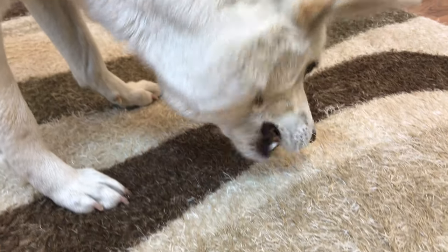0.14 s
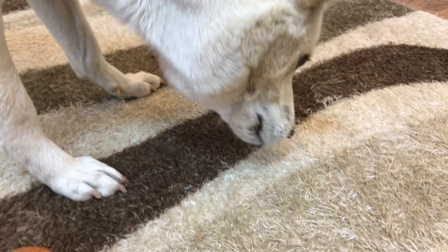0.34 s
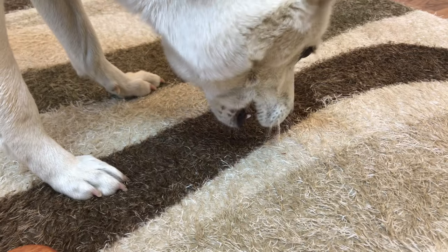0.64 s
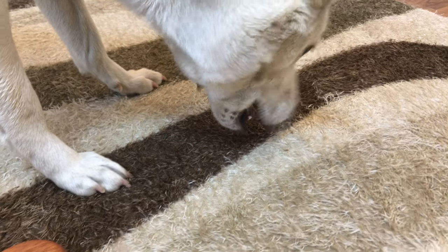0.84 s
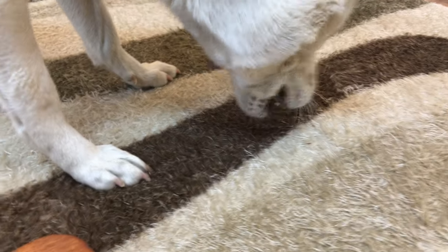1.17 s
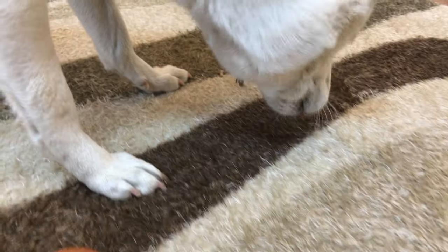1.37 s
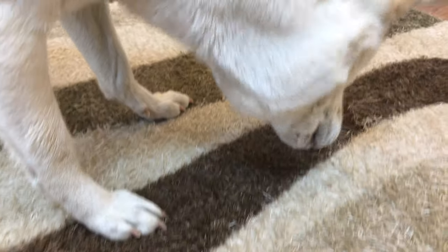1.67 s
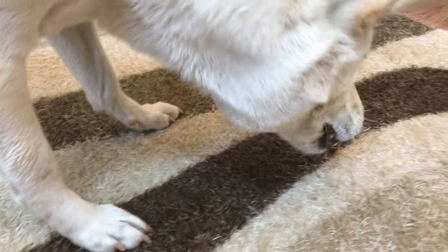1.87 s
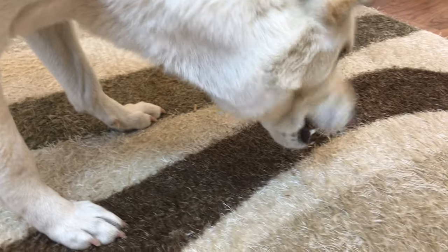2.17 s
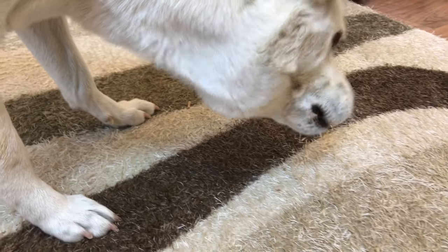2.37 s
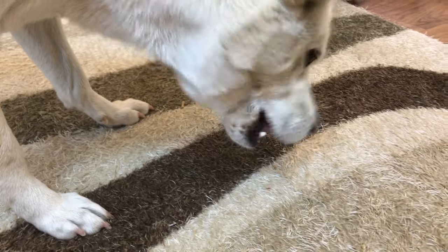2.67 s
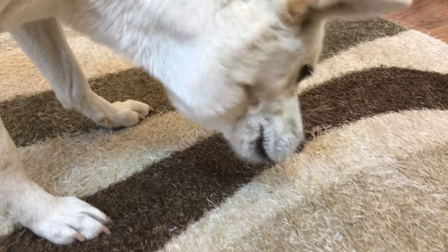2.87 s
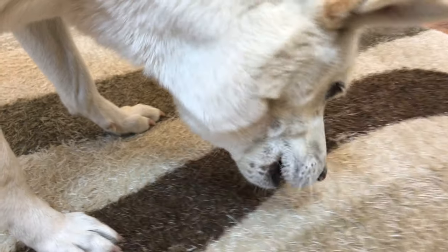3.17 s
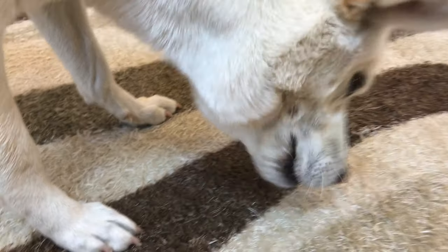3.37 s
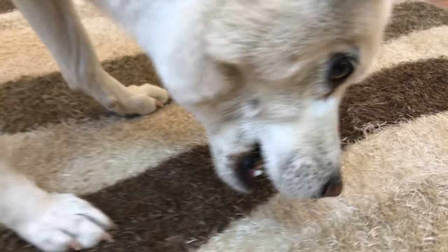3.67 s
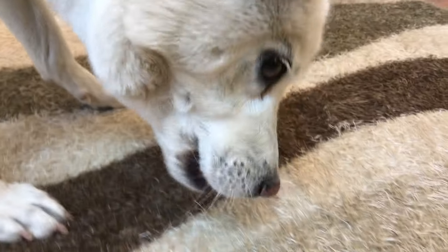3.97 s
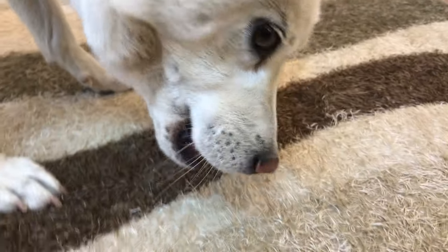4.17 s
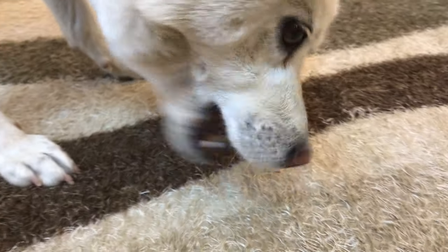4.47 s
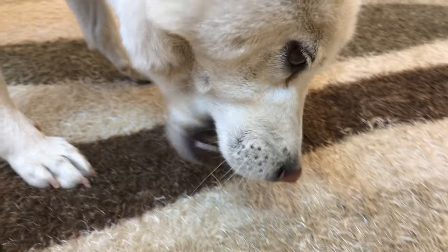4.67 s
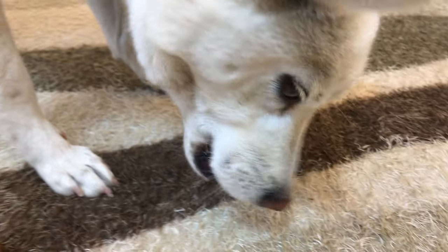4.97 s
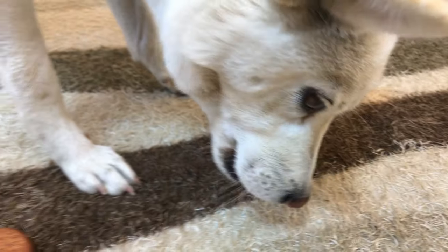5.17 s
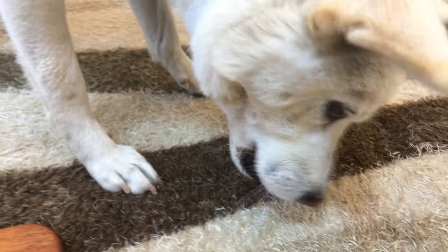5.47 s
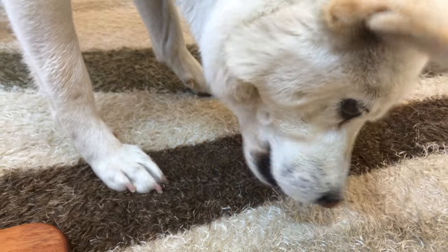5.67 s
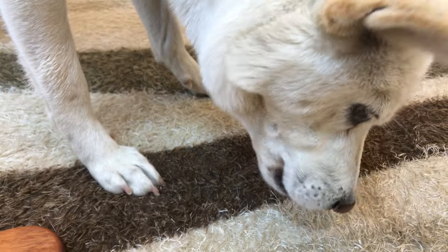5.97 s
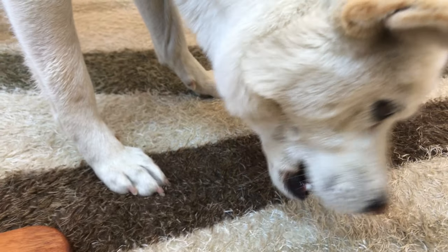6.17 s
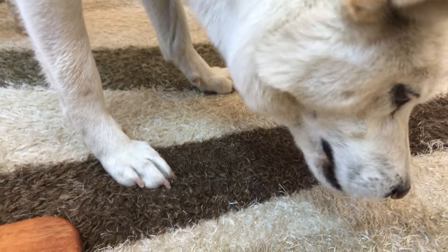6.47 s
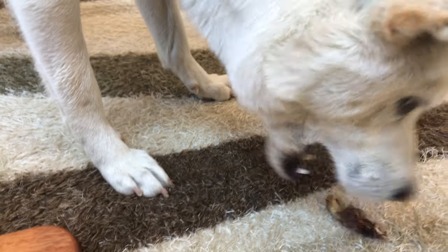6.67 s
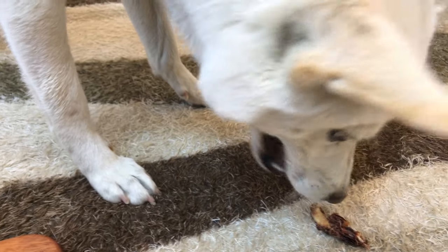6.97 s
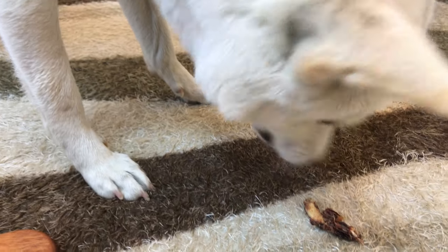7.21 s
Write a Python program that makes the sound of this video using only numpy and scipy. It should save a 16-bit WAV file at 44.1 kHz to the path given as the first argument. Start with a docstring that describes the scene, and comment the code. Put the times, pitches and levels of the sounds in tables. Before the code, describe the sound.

A dog chews a dried bone close to the microphones on a shaggy living-room rug. From 0 to 0.9 s there is soft grinding, saliva crackle, small tooth knocks and lip clicks. Hard, dry cracks with bright splinters strike at about 1.0 and 1.1 s, then a pair near 1.36 and 1.4 s, the latter the loudest. Quieter wet gnawing, smacks and muzzle rubbing follow until a sharp crack at 2.84 s and a tight run of crunches from 3.05 to 3.3 s. Smaller cracks come around 3.8 to 3.95 s. A gurgling swallow at 4.2 s leads into a thin, falling tooth scrape until 4.7 s. After subdued chewing, solitary hard cracks land at 5.3, 6.0 to 6.1 and 6.43 s, some with low bumps. Dull thumps fall at 6.56 and 6.7 s, then light wet mouthing ends. Short room reverberation and faint steady hush throughout.

```python
"""In a living room, close to the microphones, a dog chews a dried bone on a shaggy rug.
Bursts of tiny fractures, and some ringing knocks, excite the damped modes of jaw, mouth cavity and bone
and throw off a bright spray of splinters; teeth knock, lips smack, and low bumps and dull thumps sound.
With each stroke of the jaw teeth grind, crumbs break, saliva crackles and the muzzle rubs the pile.
The dog swallows once and a tooth scrapes the bone; floor and walls answer over a faint steady hush."""
import sys
import numpy as np
from scipy import signal
from scipy.fft import rfft, irfft, next_fast_len
from scipy.io import wavfile
from scipy.ndimage import map_coordinates

SR = 44100
rng = np.random.default_rng(int(sys.argv[2]) if len(sys.argv) > 2 else 0)


def transcribe(u):
    """Save the signal u as a 16-bit wav file named by the first command-line argument.

    u: samples, shape (n,) or (channels, n), limited to [-1, 1]; the rate is SR.
    q: integer samples, one column per channel.
    """
    v = np.clip(np.atleast_2d(u).T, -1, 1)
    q = np.round(v * 32767).astype(np.int16)
    wavfile.write(sys.argv[1], SR, q)


N = 323694  # length [samples]


def amp(db):
    """The decibel law: level to amplitude ratio."""
    return 10 ** (np.asarray(db) / 20)


def unit(x):
    """Normalisation to an rms of 1."""
    return x / np.sqrt(np.mean(x ** 2) + 1e-20)


def per_ms(parts):
    """Energy normalisation: each row gets the energy of 1 ms at rms 1."""
    energy = np.sum(parts ** 2, axis=-1, keepdims=True)
    return parts / np.sqrt(energy / (SR / 1000))


def along(points, hz):
    """Interpolation of (frequency [Hz], value) points on a logarithmic frequency axis."""
    f, v = np.transpose(points)
    return np.interp(np.log(hz + 1), np.log(f + 1), v)


def wobble(rate):
    """Band-limited randomness: a smooth curve through random knots, rate of them a second."""
    knots = rng.standard_normal(int(N * rate / SR) + 4)
    return map_coordinates(knots, [np.arange(N) * rate / SR])


def filtered(x, response):
    """Linear filtering: the spectrum of x times a response of frequency."""
    n = x.shape[-1]
    padded = next_fast_len(n + SR // 4)
    return irfft(rfft(x, padded) * response(np.fft.rfftfreq(padded, 1 / SR)), padded)[..., :n]


def causal(points, size=2048):
    """Minimum-phase response with the gain of (frequency [Hz], gain [dB]) points, by cepstral folding."""
    cepstrum = irfft(np.log(amp(along(points, np.fft.rfftfreq(size, 1 / SR)))))
    cepstrum[1:size // 2] *= 2
    cepstrum[size // 2 + 1:] = 0
    return np.exp(rfft(cepstrum))


def resonance(f, hz, width):
    """Damped harmonic oscillator: one mode of unit peak gain, hz and width in Hz."""
    return 1j * f * width / (hz * hz - f * f + 1j * f * width)


# likeness of left and right in a diffuse field: (frequency [Hz], correlation [0-1])
LIKENESS = [(30, 0.3), (130, 0.12), (300, 0.59), (1400, 0.99), (3100, 0.52), (6800, 0.17), (15000, .1)]


def diffuse(pair, spectrum):
    """Diffuse-field coherence: two unrelated signals are coloured and blended to the stated likeness."""
    turn = lambda hz: np.arccos(np.clip(along(LIKENESS, hz), -1, 1)) / 2
    blend = lambda hz: amp(along(spectrum, hz)) * np.array([np.cos(turn(hz)), np.sin(turn(hz))])
    mid, side = filtered(pair, blend)
    return np.array([mid + side, mid - side])


# colour of the hush of the house: (frequency [Hz], relative density [dB per Hz])
HUSH_COLOUR = [(15, -44), (25, 2), (114, 7.5), (175, 3), (695, -3.5), (1130, -11), (1560, -7), (2280, -8.5),
               (3160, -12), (6210, -16.5), (9070, -18.5), (14800, -20.5), (16000, -28.5)]


def room_tone(level_db=-66):
    """Stationary diffuse noise: the faint steady hush of the house."""
    return amp(level_db) * unit(diffuse(rng.standard_normal((2, N)), HUSH_COLOUR))


def stroke(s, length, attack_s=0.0067, release_s=0.012):
    """Trapezoidal envelope: the pressure of one stroke builds, holds and lets go."""
    corners = [s - attack_s, s, s + length, s + length + release_s]
    return np.interp(np.arange(N) / SR, corners, [0, 1, 1, 0])


def crackle(rate, spread_db, spectrum):
    """Random impulse train: clicks of very unequal size excite one response; rms 1."""
    sizes = amp(spread_db * np.minimum(rng.exponential(size=N), 3)) * rng.choice([-1, 1], N)
    clicks = (rng.random(N) < rate / SR) * sizes
    return unit(signal.fftconvolve(clicks, irfft(causal(spectrum)))[:N])


def pops(rate, low_hz, high_hz, cycles, spread_db, spectrum, size=400):
    """Superposed damped oscillations: random pops ring a few cycles, each at its own pitch; rms 1."""
    when, pitch, life, strength = rng.random((int(rate * N / SR), 4)).T[..., None]
    hz = low_hz * (high_hz / low_hz) ** pitch
    turns = hz * np.arange(size) / SR
    sizes = hz * amp(spread_db * np.minimum(-np.log(1 - strength), 3))
    rings = sizes * np.sin(2 * np.pi * turns) * np.exp(-turns / (cycles * (.5 + life)))
    places = (when * N).astype(int) + np.arange(size)
    track = np.bincount(places.ravel(), rings.ravel(), N + size)[:N]
    return unit(filtered(track, lambda f: amp(along(spectrum, f))))


# strokes of jaw and tongue, levels before the gain of each part:
# (start [s], length [s], grinding level [dB], saliva level [dB])
STROKES = [(0.0, .13, -60.5, -70), (0.293, 0.079, -59, -67), (0.473, 0.094, -65.5, -63.5),
           (0.597, 0.068, -56.5, -76), (0.772, 0.27, -70, -66), (0.993, 0.1, -60.5, -68),
           (1.316, .1, -57.5, -53.5), (1.603, 0.15, -60, -63), (1.936, 0.12, -59.5, -61),
           (2.113, 0.12, -65.5, -61.5), (2.384, 0.11, -58, -63.5), (2.608, 0.24, -59, -62.5),
           (2.872, 0.13, -65, -63), (3.036, 0.16, -52.5, -59), (3.407, 0.095, -71, -62),
           (3.77, .13, -62.5, -62.5), (4.005, 0.22, -61.5, -58.5), (4.383, 0.18, -61, -61.5),
           (4.715, 0.1, -58.5, -58.5), (4.943, 0.44, -68.5, -70.5), (5.523, 0.14, -66, -63),
           (5.785, 0.054, -69.5, -59), (5.879, .055, -54, -61), (6.213, 0.05, -76, -57.5),
           (6.496, 0.17, -67.5, -59), (6.78, 0.043, -65.5, -62), (6.93, 0.063, -69.5, -60),
           (7.05, 0.098, -73, -61), (7.304, 0.051, -57.5, -62)]
# colours of tooth on bone, bursting saliva, muzzle on rug, fur and pile: (frequency [Hz], relative gain [dB])
GRIND = [(300, -23), (750, -3), (930, 3), (1080, 4), (1220, 1.5), (1400, 1), (1700, -4), (2300, -3),
         (4000, -28.5)]
SALIVA = [(1200, -20), (2400, 2.5), (4000, 0), (6300, 2), (8500, -18), (12000, -5.5), (16000, -1.5)]
RUB = [(40, -23), (120, -2), (260, 1), (600, -0.5), (1000, -8.5), (3000, -44.5)]
RUSTLE = [(1500, -25.5), (2800, -4.5), (4200, 0), (6300, -6), (7600, -1.5), (9500, -13.5), (16000, -15.5)]


def gnawing(rub_gain_db=-10, grind_gain_db=-4, saliva_gain_db=-3.0, rustle_gain_db=-7, hollow_gain_db=-10,
            spurt_db=5.0):
    """Random impulse excitation: teeth grind, saliva pops, muzzle and fur rub the rug, stroke by stroke."""
    pressure, wetness = amp(-73), amp(-69.5)  # the mouth is never quite still
    for s, length, grind_db, saliva_db in STROKES:
        shape = stroke(s, length)
        pressure = np.maximum(pressure, amp(grind_db) * shape)
        wetness = np.maximum(wetness, amp(saliva_db) * shape)
    spurts = spurt_db * wobble(45)  # [dB]
    rub = pressure * amp(rub_gain_db + .5 * spurts) * crackle(900, 6, RUB)
    grind = pressure * amp(grind_gain_db + spurts) * pops(460, 600, 3200, 2.6, 5.0, GRIND)
    saliva = wetness * amp(saliva_gain_db + spurts) * pops(1800, 2000, 15500, 2.4, 8, SALIVA)
    rustle = wetness * amp(rustle_gain_db + spurts) * crackle(5000, 5.4, RUSTLE)
    # the half-closed mouth rings while the teeth grind: 1107 Hz, 80 Hz wide
    cavity = filtered(crackle(1200, 2.7, GRIND), lambda f: resonance(f, 1107, 80))
    hollow = pressure * amp(hollow_gain_db) * unit(cavity)
    return rub + grind + hollow + saliva + rustle


# crumbs(), knocks(), smacks() and cracks() each return their contacts as rows of
# (time [s], crumble time [s], jaw [dB], mouth [dB], mouth pitch [Hz], bone [dB], bone pitch [Hz],
# splinters [dB])
MOUTH_HZ, BONE_HZ = 1120, 2380  # usual pitch of the cavity and of the bone
THUD_DB = -10.5  # thud in the jaw, against the ring in the mouth (crumbs: in the bone)


def crumbs(count=2, crumble_s=.0015, over_grind_db=8.5, spread_db=3):
    """Brittle fracture: bits break at random moments of each stroke, louder under harder grinding."""
    rows = []
    for s, length, grind_db, _ in STROKES:
        for when, draws in zip(rng.random(count), rng.standard_normal((count, 4))):
            size, hollow, bright, pitch = draws
            db = grind_db + over_grind_db + spread_db * size
            at = np.clip(s + when * length, 0, N / SR)
            rows.append((at, crumble_s, db + THUD_DB, db + 2 * hollow, MOUTH_HZ * np.exp(.12 * hollow),
                         db, BONE_HZ * np.exp(.2 * pitch), db + 3 * bright))
    return rows


# teeth knock on the bone, and two dull thumps (6.5647 s, 6.7048 s) with hardly any mouth ring:
# (time [s], mouth ring [dB], mouth pitch [Hz], jaw thud [dB])
KNOCKS = [(0.0495, -44.5, 920, -56), (0.241, -34, 1290, -49.5), (0.274, -41, 1240, -58),
          (0.433, -44, 1410, -47), (1.9141, -41.5, 1010, -57), (2.0399, -43, 860, -49.5),
          (2.1347, -40, 840, -46), (2.6143, -48, 1070, -48.5), (3.8842, -29, 1330, -52),
          (4.0098, -42, 1360, -42.5), (4.747, -29.5, 1330, -61.5), (4.8082, -41.5, 1240, -40.5),
          (5.5404, -44, 1424, -60), (5.5587, -40, 1420, -69), (5.6435, -40, 1120, -49.5),
          (5.6544, -42, 1240, -47), (5.6826, -31, 1250, -42.5), (6.0084, -22, 1020, -32.5),
          (6.5647, -63, 1130, -36.5), (6.7048, -60.5, 840, -43.5), (6.862, -42, 970, -52),
          (6.878, -45.5, 990, -50.5), (7.1445, -49, 1060, -53.5), (7.252, -50, 730, -64)]


def knocks(contact_s=0.002, bone_db=-17, splinter_db=-24.5):
    """Impact excitation: knocks and dull thumps, bone and bright spray at fixed levels under the mouth ring."""
    return [(s, contact_s, jaw_db, db, hz, db + bone_db, BONE_HZ, db + splinter_db)
            for s, db, hz, jaw_db in KNOCKS]


# lips and tongue part with a bright wet click: (time [s], parting time [s], level [dB])
SMACKS = [(0.0895, 0.014, -41), (0.096, 0.00026, -44), (0.393, 0.0016, -51), (0.4733, 0.0013, -40),
          (1.5087, 0.00052, -39), (1.8335, 0.0012, -42.5), (1.936, 0.00031, -49), (2.1283, .004, -47),
          (2.2886, 0.0013, -45.5), (3.423, 0.00069, -40), (3.5665, 0.0038, -42), (4.716, 0.0031, -43.5),
          (5.8366, 0.0012, -42), (5.9174, 0.0026, -46), (6.1467, 0.00089, -44), (6.1528, 0.0014, -45),
          (6.2376, 0.0033, -38), (6.355, 0.00078, -45), (6.526, 0.0031, -45), (6.556, 0.0013, -44),
          (6.668, 0.00093, -47), (7.0608, 0.0009, -47.5)]


def smacks(body_db=-10, thud_db=-21.5):
    """Sudden release: a bright click, with mid ring and thud at fixed levels under it."""
    return [(s, parting_s, db + thud_db, db + body_db, MOUTH_HZ, db + body_db, BONE_HZ, db)
            for s, parting_s, db in SMACKS]


# the bone cracks, or a tooth knocks on it with some bone ring (5.1977 s, 5.2206 s):
# (time [s], crumble time [s], bone level [dB], mouth ring over that [dB],
# splinters over that [dB], mouth pitch [Hz], bone pitch [Hz])
CRACKS = [(0.362, 0.0019, -49, -21, -12, 1400, 2340), (0.3798, 0.0023, -47, -16, -1, 1230, 2300),
          (0.4806, 0.0031, -38, -19, -1.5, 980, 3900), (0.604, 0.002, -40, 0, -3, 1240, 3470),
          (0.6097, 0.00058, -43, 3.5, 8.5, 1250, 3570), (0.989, .0033, -18, -10.5, -3, 1320, 2450),
          (1.0754, 0.00078, -37, -20, -5, 1710, 2360), (1.0956, 0.00032, -19.5, -1, -2.5, 1550, 2870),
          (1.101, 0.0012, -18.5, 1.5, -2.5, 1590, 2500), (1.3202, 0.00082, -41.5, 1, 6.5, 1040, 2430),
          (1.3601, 0.0019, -21, -11.5, -6.5, 1160, 2430), (1.3837, 0.00052, -31, -0.5, -21, 1230, 2250),
          (1.4064, 0.001, -11.5, -3, -12, 1300, 2640), (1.6418, 0.0016, -42.5, -2, 1.5, 1040, 2900),
          (1.691, 0.0029, -34, -0.5, 1, 1624, 2970), (2.4, 0.00018, -35, -2, 0, 1305, 1870),
          (2.4444, 0.0033, -41.5, 2, 2, 1080, 2060), (2.469, 0.00054, -43, 0, 5, 920, 2730),
          (2.6828, .0018, -41, 0.5, -6, 1060, 2400), (2.761, .0029, -41.5, -3, 1, 950, 3740),
          (2.78, 0.002, -43, -4, -1.5, 1010, 2500), (3.0422, 0.0024, -44.5, -12, -6, 1170, 2970),
          (2.842, 0.0019, -18, -7, -7.5, 1170, 2750), (3.0747, 0.0048, -31, -1.5, -10.5, 1110, 2800),
          (3.0987, 0.0033, -27.5, -1.5, -1.5, 1120, 2900), (3.1267, 0.00053, -30.5, -3, 6.5, 1140, 3800),
          (3.1503, 0.0052, -24, -7, -9, 1130, 3700), (3.221, 0.0017, -15, -7, -11.5, 890, 2210),
          (3.2492, 0.00028, -16.5, 6, -6.5, 1240, 2090), (3.282, 0.001, -30.5, 2.5, -6.5, 1360, 2170),
          (3.286, 0.00047, -26, 1.5, -14, 1040, 2410), (3.4814, 0.00067, -43, -10, -22, 930, 2520),
          (3.5043, 0.0022, -37.5, -4, -31, 1142, 2800), (3.5247, 0.00091, -39.5, 2, -18, 1140, 2560),
          (3.8171, 0.00045, -37.5, -3, -15, 1337, 2630), (3.8477, .002, -30.5, 2, -13, 1170, 2080),
          (3.9228, 0.00023, -28, 1, -5.5, 1340, 2270), (3.9323, 0.0015, -22.5, -2, 1.5, 1310, 2430),
          (4.1784, 0.013, -39.5, 2, -18, 1170, 3970), (4.189, 0.00027, -33, 5.5, -16, 1420, 2170),
          (4.2561, 0.0031, -40.5, 0, 5, 714, 3830), (5.1977, .0015, -47.5, 8, -3.5, 1030, 2300),
          (5.2206, 0.0012, -46, 7, -5, 1280, 2160), (5.3238, 0.0013, -18.5, 3.5, 4.5, 1296, 2260),
          (6.081, 0.0015, -17.5, 9.5, -8, 1330, 2290), (6.4208, 0.0017, -36.5, 3, -26, 1260, 2390),
          (6.427, 0.00047, -22.5, -7.5, -2.5, 1190, 2260), (6.433, 0.0028, -27, 7, -7, 1100, 1880),
          (6.9446, 0.0018, -44.5, -12, -4, 1520, 2380), (7.0914, 0.00065, -42, -11.5, -26, 1040, 2770),
          (7.1019, 0.00045, -44.5, -23, -24.5, 1690, 2770)]


def cracks(lead_s=0.0033, lead_crumble_s=0.004, lead_db=-26, lead_from_db=-30.5):
    """Fracture and impact: cracks and ringing knocks; above lead_from_db a faint splitting precedes."""
    rows = []
    for s, crumble_s, db, ring_db, splinter_db, mouth_hz, bone_hz in CRACKS:
        stages = [(s, crumble_s, db)]
        if db > lead_from_db:
            stages.append((s - lead_s, lead_crumble_s, db + lead_db))
        for at, time, level in stages:
            mouth_db = level + ring_db
            rows.append((at, time, mouth_db + THUD_DB, mouth_db, mouth_hz, level, bone_hz,
                         level + splinter_db))
    return rows


# what each struck part passes: (frequency [Hz], relative gain [dB])
JAW = [(25, -37.5), (70, -8.5), (140, -9.5), (280, 1), (430, 0.5), (620, 1.5), (1000, -16), (3000, -63.5)]
MOUTH = [(100, -39), (400, 8.5), (800, 5.5), (1500, 3), (2200, -4.5), (5000, -30.5)]
BONE = [(300, -27), (1200, -2), (2000, 4), (3000, 1), (4400, 0.5), (8000, -25.5)]
SPLINTER = [(800, -46.5), (3000, -18), (4800, 0.5), (6400, 0.5), (8000, -7.5), (10000, -7.5), (12200, -6),
            (15500, -10), (17000, -22.5)]
# how unlike the two microphones hear the splinters: (frequency [Hz], side filter gain [dB])
SCATTER = [(3000, -1), (6000, -11.5), (10000, -13), (15000, -6)]
# the bone's second bending mode rings strongly when the splinters exceed about -21 dB, faintly below:
# (splinter level [dB], ring level [dB])
OVERTONE_RING = [(-21.5, -11), (-21, 3)]


def bites(size=2048, crumble=0.72, follow=.5, soft_width_hz=95, hard_width_hz=380, bone_width_hz=520,
          wide=4.8, overtone=2.76, overtone_width_hz=1100):
    """Modal excitation: contacts ring jaw, mouth, bone and splinters, toward microphones and walls."""
    t, f = np.arange(size) / SR, np.fft.rfftfreq(size, 1 / SR)
    jaw, mouth, bone, splinter, scatter = (causal(part) for part in (JAW, MOUTH, BONE, SPLINTER, SCATTER))
    front, around = np.zeros((2, N + size)), np.zeros(N + size)
    contacts = cracks() + knocks() + smacks() + crumbs()
    for s, crumble_s, jaw_db, mouth_db, mouth_hz, bone_db, bone_hz, splinter_db in contacts:
        age = t / max(crumble_s, 1e-4)
        # a main impulse, then a fading run of small ones
        impulses = rng.standard_normal(size) * (rng.random(size) < 9000 / SR)
        force = crumble * impulses * np.exp(-age ** 1.6)
        force[0] = -1
        # hard bites are made with the lips drawn back, so the cavity rings more briefly
        width = np.interp(mouth_db, [-33, -14], [soft_width_hz, hard_width_hz])

        def body(broad):
            cavity = mouth * resonance(f, mouth_hz, width)
            return np.array([jaw, cavity, -bone * resonance(f, bone_hz, bone_width_hz * broad)])

        levels = amp([jaw_db, mouth_db, bone_db])
        # the bone feels every impulse in full; jaw and cavity feel only a share of the later ones
        later = rfft(force) + 1
        drive = -1 + np.array([[follow], [follow], [1]]) * later
        knock = levels @ per_ms(irfft(drive * body(1.0)))
        # a short bright spray differs between left and right and rings the second mode
        ring = amp(np.interp(splinter_db, *np.transpose(OVERTONE_RING)))
        chips = splinter * (1 + ring * resonance(f, overtone * bone_hz, overtone_width_hz))
        spray = rng.standard_normal((2, size)) * np.sqrt(age) * np.exp(-1.7 * age)
        mid, side = amp(splinter_db) * per_ms(irfft(rfft(spray) * chips))
        side = irfft(rfft(side) * scatter)
        start = round(s * SR)
        front[:, start:][:, :size] += [knock + mid + side, knock + mid - side]
        # summed over all directions the bone's ring is broader and the spectrum smoother
        around[start:][:size] += levels @ per_ms(irfft(body(wide)))
        around[start:][:size] += amp(splinter_db) * per_ms(irfft(splinter))
    return front[:, :N], around[:N]


def near(x, bounce_s=.0048, bounce_db=-17, lag_s=.000014):
    """Path differences: the sound reaches the right microphone first; a floor reflection follows."""
    bounce = lambda hz: 1 + amp(bounce_db) * np.exp(-2j * np.pi * hz * bounce_s)
    ears = np.array([[1], [-1]])  # left late by half the lag, right early by half
    return filtered(x, lambda hz: bounce(hz) * np.exp(-1j * np.pi * hz * lag_s * ears))


# reverberation time: (frequency [Hz], time to fall 60 dB [s])
ROOM_T60 = [(150, 0.7), (400, 0.63), (1100, 0.48), (1600, 0.49), (2800, 0.34), (6500, 0.41), (15000, 0.39)]
# colour of the reverberation: (frequency [Hz], gain [dB])
ROOM_SEND = [(60, -10.5), (250, -6.5), (500, -10), (1000, -9), (1600, -9.5), (2600, -13), (4500, -14),
             (7000, -15.5), (15000, -14.5)]


def room(x, count=20, build_s=.006):
    """Exponential decay of a diffuse field; its fine pattern, new in each span, changes as the head moves."""
    out = np.zeros((2, N + SR))
    for span in np.array_split(np.arange(N), count):
        hz, t, z = signal.stft(rng.standard_normal((2, SR * 2 // 3)), SR, nperseg=256)
        t60 = along(ROOM_T60, hz)[:, None]
        equal_energy = np.sqrt(2 * np.log(1000) / (t60 * SR))  # whatever the decay time
        tail = signal.istft(z * amp(-60 * t / t60) * equal_energy, SR, nperseg=256)[1]
        tail = diffuse(tail, ROOM_SEND)
        tail = tail * (1 - np.exp(-(np.arange(tail.shape[1]) / SR / build_s) ** 2))
        wet = signal.fftconvolve(x[span][None], tail, axes=1)
        out[:, span[0]:span[0] + wet.shape[1]] += wet
    return out[:, :N]


# the jaws slam shut or the chin meets the rug: (time [s], drive level [dB], pitch [Hz])
BUMPS = [(1.1, -46, 210), (1.408, -40, 190), (5.324, -38.5, 115), (6.081, -29.5, 207), (6.436, -31, 131.4),
         (6.567, -50.5, 230), (6.705, -57, 190)]


def bumps(size=4096, t60_s=0.048, attack_s=0.00069):
    """Heavily damped oscillation: each bump is a soft low push that dies within a few cycles."""
    t, out = np.arange(size) / SR, np.zeros(N + size)
    for s, db, hz in BUMPS:
        envelope = amp(db - 60 * t / t60_s) * (1 - np.exp(-t / attack_s))
        out[round(s * SR):][:size] += envelope * np.sin(2 * np.pi * hz * t)
    return out[:N]


# gurgles of one swallow: (start [s], length [s], drive level [dB])
GULPS = [(4.178, 0.089, -42.5), (4.249, 0.018, -41.5), (4.317, 0.13, -51.5)]
# modes of the closed throat: (frequency [Hz], width [Hz], relative gain [dB])
THROAT = [(130, 23, -5), (300, 39, -1.5), (410, 350, -9.5), (594, 75, 1), (1260, 110, -10),
          (2280, 420, -16)]


def swallow(bubble_rate=900):
    """Source and filter: wet irregular flaps ring the modes of the closed throat."""
    t = np.arange(N) / SR
    push = np.zeros(N)
    for s, length, db in GULPS:
        corners = [s, s + 0.0045, s + 0.65 * length, s + length]
        push += amp(db) * np.interp(t, corners, [0, 0.89, 0.46, 0.0012])
    flaps = rng.choice([-1, 1], N) * (rng.random(N) < bubble_rate / SR)
    # neighbouring modes alternate in sign
    throat = lambda f: sum((-1) ** k * amp(db) * resonance(f, hz, width)
                           for k, (hz, width, db) in enumerate(THROAT))
    return filtered(flaps * push, throat) / np.std(filtered(flaps, throat))


# the one slide of a tooth: (start [s], length [s])
SCRAPE_SPAN = (4.34, .39)


def scrape(level_db=-68, flutter_db=2, first_hz=2180, last_hz=1810, grain_rate=520):
    """Narrow-band friction noise: a tooth slides along the bone with a thin, broken, falling rasp."""
    s, length = SCRAPE_SPAN
    pitch = np.interp(np.arange(N) / SR, [s, s + length], [first_hz, last_hz])
    phase = 2 * np.pi * np.cumsum(pitch) / SR
    rasp = unit(wobble(grain_rate) * np.sin(phase) + wobble(grain_rate) * np.cos(phase))
    return amp(level_db + flutter_db * wobble(30)) * stroke(s, length) * rasp


# how much the head's pose sends to the walls: (time [s], gain [dB])
POSE = [(0, 3), (1.1, 6.5), (1.4, 3), (3.25, 1.5), (5.32, 0.5), (6.08, -1.5), (7.3, 2.5)]
# standing waves that colour the walls' answer: (frequency [Hz], width [Hz], gain [dB])
ROOM_MODES = [(125, 14, -6), (256, 9.8, 0.5), (365, 56, -0.5), (500, 18, 0.5), (600, 6, -12),
              (879, 9.4, -4), (1018, 10, -10)]


def scene():
    """Superposition: the chewing dog, the answer of floor and walls, and the hush."""
    front, around = bites()
    soft = gnawing() + swallow() + scrape() + bumps()
    pose = amp(np.interp(np.arange(N) / SR, *np.transpose(POSE)))
    standing = lambda f: 1 + sum(amp(db) * resonance(f, hz, width) for hz, width, db in ROOM_MODES)
    to_walls = filtered(pose * (around + soft), standing)
    return near(front + soft) + room(to_walls) + room_tone()


def record(dry, top=.75, top_hz=16300):
    """Soft saturation rounds off the tallest peaks; a steep low-pass removes what lies above top_hz."""
    rounded = dry / (1 + np.abs(dry / top) ** 6) ** (1 / 6)
    return filtered(rounded, lambda hz: 1 / np.sqrt(1 + (hz / top_hz) ** 120))


dry = scene()
out = record(dry)
transcribe(out)
```